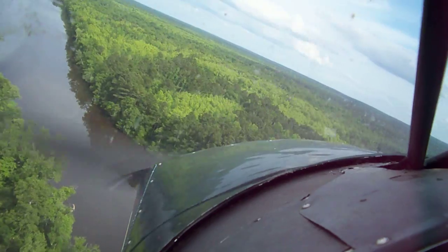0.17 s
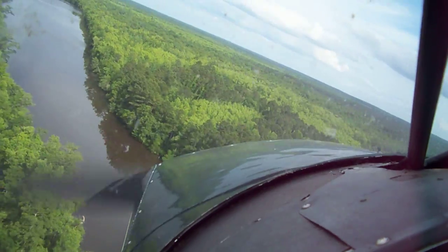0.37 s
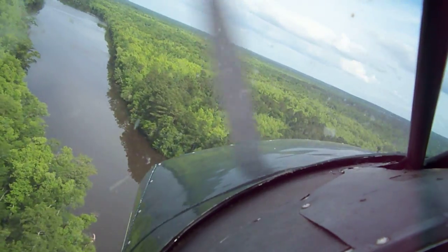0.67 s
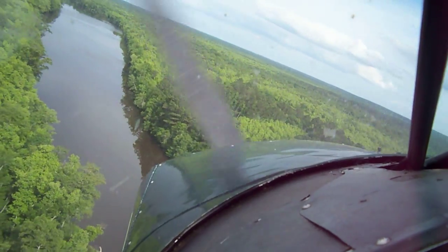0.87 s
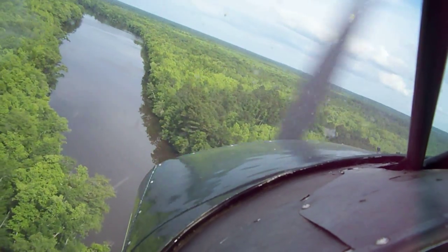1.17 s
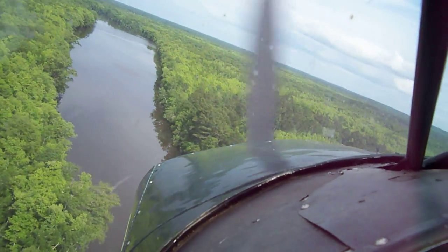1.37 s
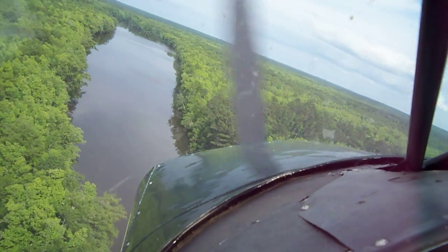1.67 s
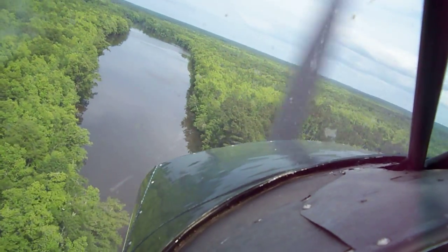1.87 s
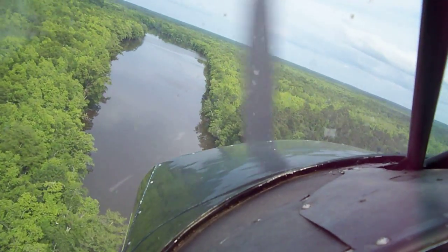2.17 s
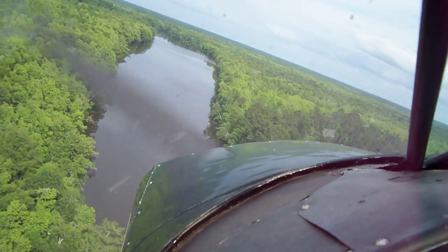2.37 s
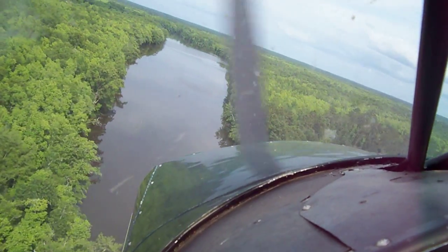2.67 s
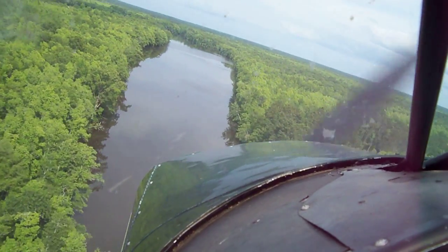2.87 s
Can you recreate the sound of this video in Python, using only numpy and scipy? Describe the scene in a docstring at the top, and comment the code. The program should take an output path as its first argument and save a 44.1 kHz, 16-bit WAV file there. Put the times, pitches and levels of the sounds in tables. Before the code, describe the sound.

Small propeller plane engine drones and throbs inside a windy cabin, easing down in pitch midway

```python
"""Air rushes around the cabin of a small propeller plane, heard over its throbbing piston engine.
Shaped noise makes the deep buffeting, cabin drone, slipstream roar and gap hiss; eddies add thumps and slaps.
Sines locked to the shaft make the engine note, with noise puffs at each firing and a thin gear whine.
Halfway through the throttle is eased: puffs and whine weaken, the tones change balance,
and wavering cabin resonances boom as the propeller runs down."""
import sys
import numpy as np
from scipy import signal
from scipy.fft import rfft, irfft
from scipy.io import wavfile
from scipy.ndimage import uniform_filter1d, minimum_filter1d

SR = 44100
rng = np.random.default_rng(int(sys.argv[2]) if len(sys.argv) > 2 else 0)


def materialize(psi):
    """Save the field psi as 16-bit PCM at rate SR to the path in sys.argv[1].

    A 1-D psi becomes a single channel; in a 2-D psi each row is a channel.
    """
    bounded = np.clip(np.atleast_2d(psi).T, -1, 1)
    quanta = np.round(bounded * 32767).astype(np.int16)
    wavfile.write(sys.argv[1], SR, quanta)


N = 133182  # samples, about 3 s

# Spectral shapes of the four layers of air, relative levels: f/Hz, level/dB
BUFFET_SPECTRUM = [(10, -19), (20, 2.5), (32, 0), (45, 0), (58, -9.5), (80, -10), (100, -15), (130, -13)]
CABIN_SPECTRUM = [(110, -3.5), (175, -1), (205, -4.5), (240, -6), (290, -9), (340, -9), (380, -16.5)]
SLIPSTREAM_SPECTRUM = [(210, -39.5), (350, -1.5), (461, 1), (640, -4.5), (861, -6), (927, -9.5), (1060, -6),
                       (1220, -11), (1330, -10), (1610, -15), (1750, -13.5), (2190, -17), (2360, -16),
                       (3600, -26), (4020, -33.5), (4400, -36), (5720, -55), (9680, -120)]
GAP_HISS_SPECTRUM = [(2350, -45), (4020, -22), (4300, -9), (4620, -6), (5830, 2.5), (7220, 3), (7680, 0),
                     (8370, -10.5), (8760, -22.5), (11400, -49.5), (19300, -120)]
# Swells added to the levels of the buffeting, cabin drone and slipstream roar: t/s, level/dB
BUFFET_SWELL = [(0, 4.5), (.9, 0.5), (1.5, -1), (1.75, 3), (2.1, 1.5), (2.5, 0.5), (3.02, 5.5)]
CABIN_SWELL = [(0, -2), (.2, -1.6), (.48, -1.5), (.7, 1.5), (.98, 1.5), (1.2, -2), (1.5, 0.5), (1.8, 0),
               (2.03, -1.5), (2.35, 2.3), (2.6, -2.5), (2.7, -0.5), (3.02, 2)]
ROAR_SWELL = [(0, 0.5), (.2, 1), (.31, 0.2), (.41, 0.9), (.51, 1.5), (.58, -0.5), (.66, 0.3), (.8, 0.5),
              (.89, 0), (1.06, 0.4), (1.32, 0.5), (1.57, 1), (1.82, .5), (1.9, -0.1), (2.05, 0.2),
              (2.23, 0.9), (2.6, 0), (2.68, 0), (2.82, -0.1), (3.02, 0)]
# Gusts and lulls in the airflow, full depth in the hiss: t/s, length/s, level/dB
GUSTS = [(0.684, .04, -0.2), (.755, 0.04, 0.5), (1.424, 0.024, 1.5), (1.595, .02, 1.6), (1.758, 0.015, 0.5),
         (1.81, 0.029, 2), (1.988, 0.041, -0.5), (2.12, 0.033, 1.5), (2.304, 0.21, 0), (2.905, 0.028, -0.5),
         (2.957, 0.014, -3.5)]
# Thumps of air on the cabin, levels before THUMP_TRIM_DB: t/s, level/dB, f/Hz, length/s
THUMPS = [(0.475, -3, 24.5, 0.038), (0.647, -8.5, 24.7, 0.063), (0.791, -7, 26.5, 0.032),
          (0.998, -3, 21.5, 0.071), (1.296, -6, 24.8, 0.067), (1.369, -6.5, 22.2, 0.038),
          (1.486, -3, 27, 0.057), (1.593, -3.5, 24, 0.042), (1.857, -7, 26.8, 0.051),
          (1.927, -9.5, 21, 0.054), (2.337, -6.5, 28.7, 0.026), (2.424, -2.5, 30, 0.037),
          (2.532, -6, 26.3, 0.034), (2.759, -6.5, 29, 0.067), (2.857, -3.5, 30, 0.024),
          (2.995, -7, 33.8, 0.022)]
# Slaps of turbulence on the panels, levels before SLAP_TRIM_DB: t/s, level/dB, centre f/Hz
SLAPS = [(.589, -24, 420), (.925, -21, 140), (1.043, -27, 450), (1.281, -18.5, 124), (1.504, -26, 140),
         (1.82, -26.5, 750), (1.995, -24.5, 500), (2.103, -18, 113), (2.108, -31, 700), (2.225, -20, 284),
         (2.511, -16, 151), (2.592, -18, 151), (2.618, -22.5, 330), (2.87, -20, 393)]
# Shaft speed: t/s, f/Hz
SHAFT_SPEED = [(0, 22.3), (1.0, 22.3), (1.52, 23.3), (1.72, 21.4), (2.0, 18.6), (2.3, 19.5), (2.6, 19),
               (3.02, 18)]
# Engine tones: multiple of shaft speed, level under power/dB, level throttled back/dB
ENGINE_ORDERS = [(2, -29.5, -24.5), (3, -24, -38), (3.5, -27, -34.5), (4, -39, -24.5), (5, -28, -37),
                 (5.5, -36.5, -34.5), (6, -36, -36.5), (6.5, -50.5, -35), (8, -34, -39.5),
                 (13.5, -41.5, -41.5)]
# Cabin resonances: centre f/Hz, level at rest/dB, level at the height of the boom/dB
CABIN_MODES = [(102.2, -37, -30), (126.6, -41.5, -34), (148.8, -37.5, -32.5), (162.2, -39.5, -33),
               (172.1, -39.5, -30.5), (252, -40, -33), (285, -39.5, -38), (294.9, -40.5, -37.5),
               (389.3, -58, -39)]

# Rates below are in Hz: a wander at a given rate loses its faster motion above half of it
BUFFET_DB, CABIN_DB, SLIPSTREAM_DB, HISS_DB = -18, -26, -28.5, -41.5
BUFFET_TO_CABIN_HZ, CABIN_TO_SLIPSTREAM_HZ, SLIPSTREAM_TO_HISS_HZ = 120, 360, 4200
HISS_DB_PER_S = -.5  # the airspeed falls a little
GUST_DB, GUST_RATE, FLUTTER_DB, FLUTTER_RATE = 0.34, 11, 0.42, 180
GUST_SHARE_IN_ROAR = 0.69
HISS_GRAIN_DB, HISS_GRAIN_RATE = .5, 340
THUMP_TRIM_DB = -3.5
SLAP_TRIM_DB, SLAP_S, SLAP_OCTAVES = -4, .013, 0.68
THROTTLE_BACK_S, THROTTLE_TAKES_S = 1.58, 0.46  # middle and length of the easing
TONE_WAVER_DB, TONE_WAVER_RATE = 1.67, 9
FIRINGS_PER_TURN = 2
PUFF_DB, PUFF_DROP_DB, PUFF_HZ, PUFF_OCTAVES = -39, -4, 690, 0.82
PUFF_DECAY = 0.2  # firing periods
WHINE_ORDER = 60  # multiple of shaft speed
WHINE_DB, WHINE_DROP_DB, WHINE_RATE = -47.5, -6, 10
MODE_WAVER_HZ, MODE_WAVER_DB, MODE_WAVER_RATE = 2.5, 2, 7.15
BOOM_AT_S, BOOM_LASTS_S = 2.446, 0.34
LIMIT_DB, LIMIT_HOLD_S = -2.5, 0.017
TOP_HZ = 8750


def undb(db):
    """Decibels to gain."""
    return 10 ** (np.asarray(db) / 20)


def unit(x):
    """Scale to an rms of 1."""
    return x / np.sqrt(np.mean(x ** 2))


def curve(t, rows):
    """Straight lines through (time, value) rows."""
    times, values = np.array(rows).T
    return np.interp(t, times, values)


def bump(t, at, length):
    """A smooth rise and fall, 1 at its middle."""
    return np.exp(-((t - at) / length) ** 2)


def walk(rate):
    """Smooth random wander, low-passed noise with a spread of 1."""
    f = np.fft.rfftfreq(N, 1 / SR)
    spectrum = rfft(rng.standard_normal(N)) / (1 + (2 * f / rate) ** 4)
    return unit(irfft(spectrum, N))


def band(hz, octaves):
    """A soft-edged band of noise around hz; rms 1."""
    f = np.fft.rfftfreq(N, 1 / SR) + 1  # keeps the logarithm finite
    shape = np.exp(-.5 * (np.log2(f / hz) / octaves) ** 2)
    return unit(irfft(rfft(rng.standard_normal(N)) * shape, N))


def air(points, low, high):
    """Turbulent noise with a drawn spectrum between two steep edges; rms 1."""
    f = np.fft.rfftfreq(N, 1 / SR) + 1e-3  # avoids division by zero
    hz, db = np.array(sorted(points)).T
    shape = undb(np.interp(np.log(f), np.log(hz), db))
    edges = 1 / np.sqrt((1 + (low / f) ** 24) * (1 + (f / high) ** 24))
    return unit(irfft(rfft(rng.standard_normal(N)) * shape * edges, N))


def buffeting(t):
    """Deep turbulence presses on the cabin as swelling low noise."""
    noise = air(BUFFET_SPECTRUM, 11.0, BUFFET_TO_CABIN_HZ)
    return noise * undb(BUFFET_DB + curve(t, BUFFET_SWELL))


def thumps(t):
    """Eddies strike the cabin; each shakes its air for a cycle or a few."""
    out = 0
    for at, db, hz, length in THUMPS:
        shake = np.sin(2 * np.pi * (hz * (t - at) + rng.random()))
        out = out + undb(THUMP_TRIM_DB + db) * bump(t, at, length) * shake
    return out


def slaps(t):
    """Small eddies hit the panels as short, dull bursts of noise."""
    out = 0
    for at, db, hz in SLAPS:
        out = out + undb(SLAP_TRIM_DB + db) * bump(t, at, SLAP_S) * band(hz, SLAP_OCTAVES)
    return out


def slipstream_and_hiss(t):
    """Air roars over the airframe and hisses through gaps; both gust and flutter together."""
    flutter_db = GUST_DB * walk(GUST_RATE) + FLUTTER_DB * walk(FLUTTER_RATE)
    gust_db = sum(db * bump(t, at, length) for at, length, db in GUSTS)

    roar = air(SLIPSTREAM_SPECTRUM, CABIN_TO_SLIPSTREAM_HZ, SLIPSTREAM_TO_HISS_HZ)
    roar_db = SLIPSTREAM_DB + curve(t, ROAR_SWELL) + GUST_SHARE_IN_ROAR * gust_db

    hiss = air(GAP_HISS_SPECTRUM, SLIPSTREAM_TO_HISS_HZ, SR / 2)
    grain_db = HISS_GRAIN_DB * walk(HISS_GRAIN_RATE)
    hiss_db = HISS_DB + HISS_DB_PER_S * (t - t.mean()) + gust_db + grain_db

    return (roar * undb(roar_db) + hiss * undb(hiss_db)) * undb(flutter_db)


def cabin_drone(t):
    """Turbulent air sounds inside the cabin as a swelling low-mid drone of noise."""
    noise = air(CABIN_SPECTRUM, BUFFET_TO_CABIN_HZ, CABIN_TO_SLIPSTREAM_HZ)
    return noise * undb(CABIN_DB + curve(t, CABIN_SWELL))


def engine_tones(turns, eased):
    """Exhaust and blade tones locked to the shaft; off the throttle the blade tones take over."""
    out = 0
    for order, power_db, idle_db in ENGINE_ORDERS:
        db = power_db + (idle_db - power_db) * eased + TONE_WAVER_DB * walk(TONE_WAVER_RATE)
        tone = np.sin(2 * np.pi * (order * turns + rng.random()))
        out = out + np.sqrt(2) * undb(db) * tone  # sqrt(2): levels are rms
    return out


def cabin_boom(t):
    """Wavering resonances of the cabin, swelling for a moment as the engine slows."""
    excited = bump(t, BOOM_AT_S, BOOM_LASTS_S)
    out = 0
    for hz, rest_db, boom_db in CABIN_MODES:
        wavering_hz = hz + MODE_WAVER_HZ * walk(MODE_WAVER_RATE)
        cycles = np.cumsum(wavering_hz) / SR + rng.random()
        db = rest_db + (boom_db - rest_db) * excited + MODE_WAVER_DB * walk(MODE_WAVER_RATE)
        out = out + np.sqrt(2) * undb(db) * np.sin(2 * np.pi * cycles)
    return out


def exhaust_puffs(turns, eased):
    """A decaying burst of gas noise at every firing, weaker off the throttle."""
    gas = band(PUFF_HZ, PUFF_OCTAVES)
    since_firing = FIRINGS_PER_TURN * turns % 1  # in firing periods
    puffs = unit(gas * np.exp(-since_firing / PUFF_DECAY))
    return puffs * undb(PUFF_DB + PUFF_DROP_DB * eased)


def gear_whine(turns, eased):
    """A thin, unsteady whine that follows the shaft, weaker off the throttle."""
    angle = 2 * np.pi * WHINE_ORDER * turns
    # two random wanders in quadrature blur the tone into a narrow band
    whine = walk(WHINE_RATE) * np.cos(angle) + walk(WHINE_RATE) * np.sin(angle)
    return whine * undb(WHINE_DB + WHINE_DROP_DB * eased)


def scene():
    """Wind and engine together at the pilot's seat."""
    t = np.arange(N) / SR
    turns = np.cumsum(curve(t, SHAFT_SPEED)) / SR
    # 0 under power, 1 throttled back
    eased = np.clip((t - THROTTLE_BACK_S) / THROTTLE_TAKES_S + .5, 0, 1)
    wind = buffeting(t) + thumps(t) + slaps(t) + slipstream_and_hiss(t) + cabin_drone(t)
    engine = engine_tones(turns, eased) + exhaust_puffs(turns, eased) + gear_whine(turns, eased)
    return (wind + engine + cabin_boom(t))[None]


def record(dry):
    """A limiter holds down the biggest buffets, then a steep low-pass cuts the top."""
    hold = max(int(LIMIT_HOLD_S * SR), 2)
    gain = np.minimum(1, undb(LIMIT_DB) / (np.abs(dry) + 1e-9))
    gain = uniform_filter1d(minimum_filter1d(gain, hold), hold)  # hold each dip, then smooth it
    # 0.2 dB passband ripple, 90 dB rejection
    top_cut = signal.ellip(10, .2, 90, TOP_HZ, fs=SR, output="sos")
    return signal.sosfilt(top_cut, dry * gain)


dry = scene()
out = record(dry)
materialize(out)
```